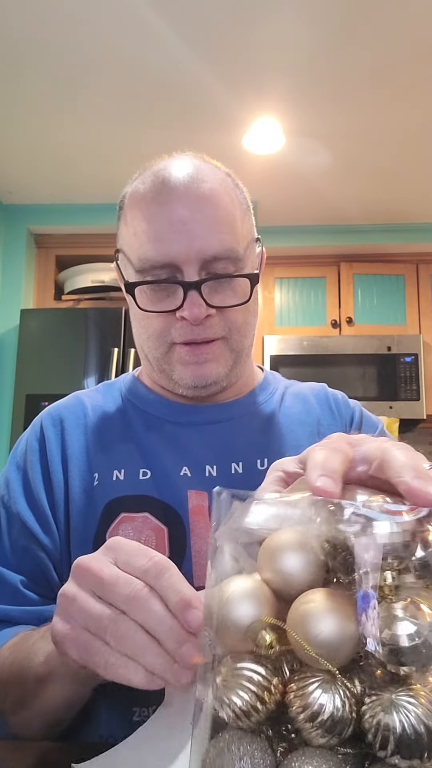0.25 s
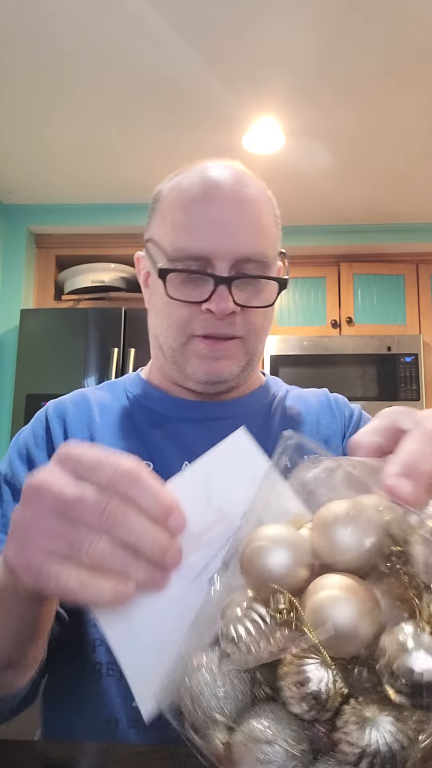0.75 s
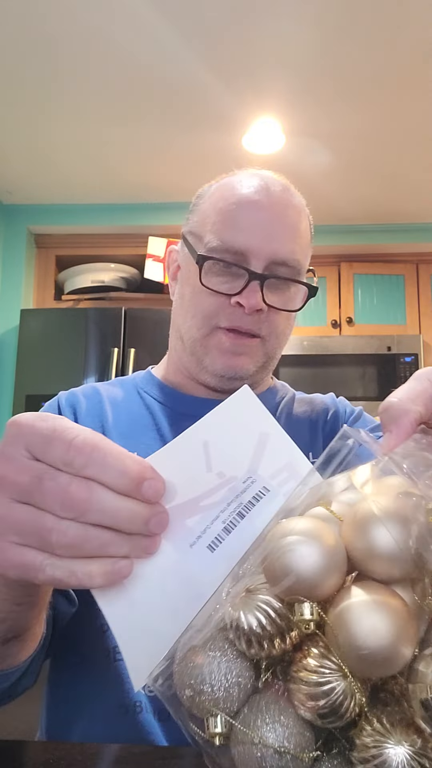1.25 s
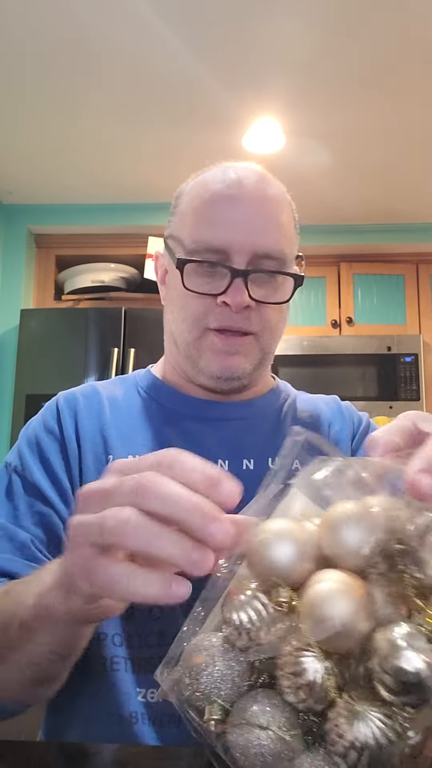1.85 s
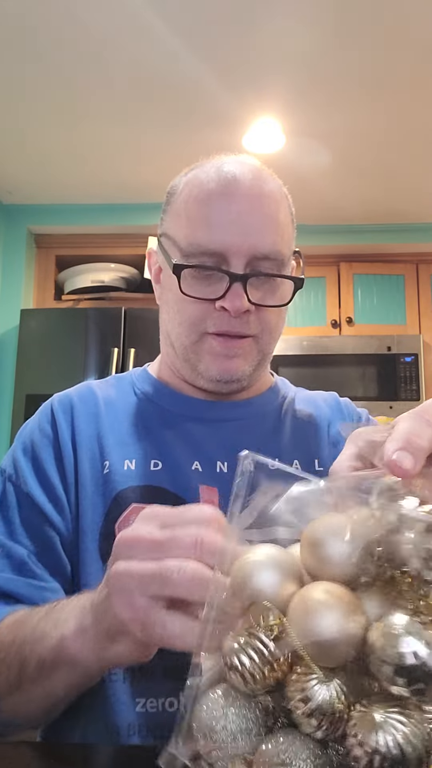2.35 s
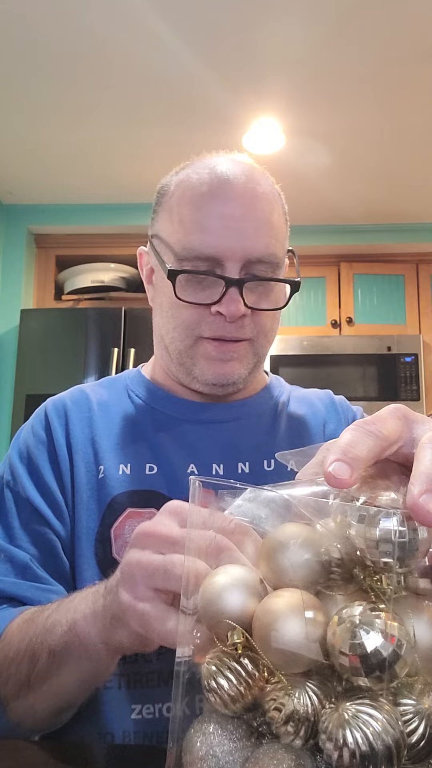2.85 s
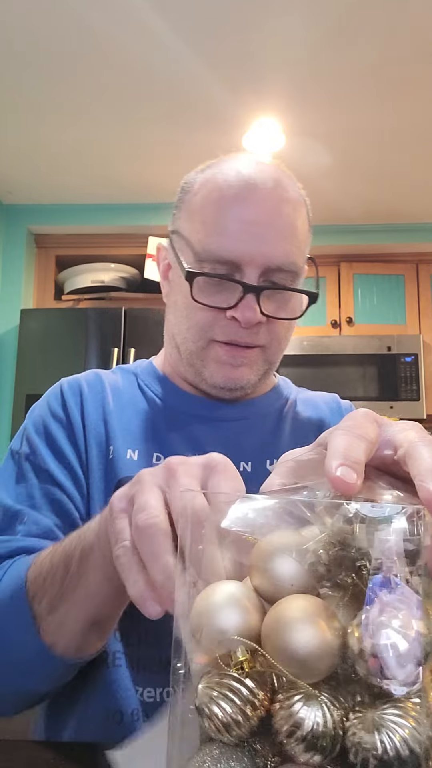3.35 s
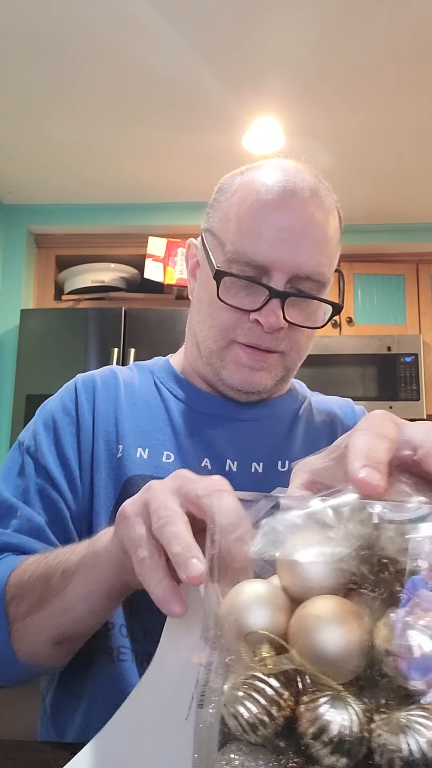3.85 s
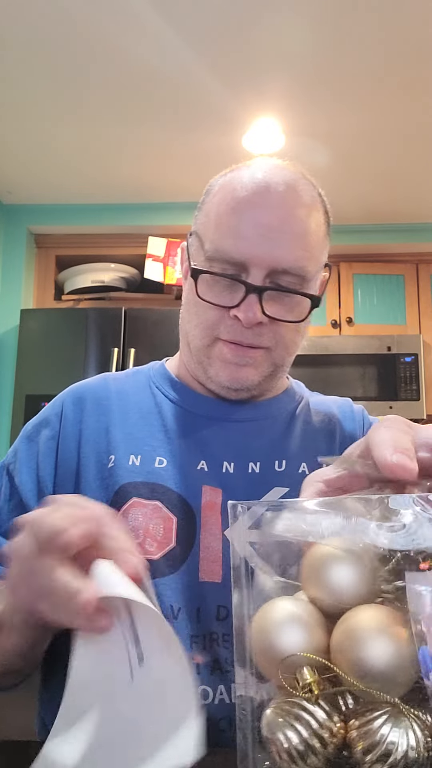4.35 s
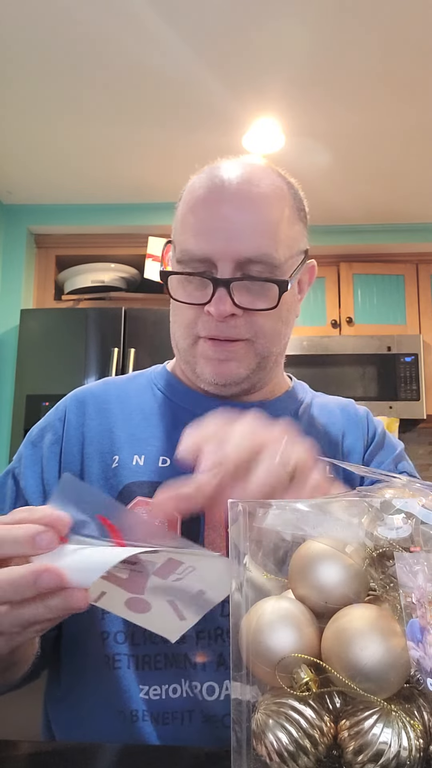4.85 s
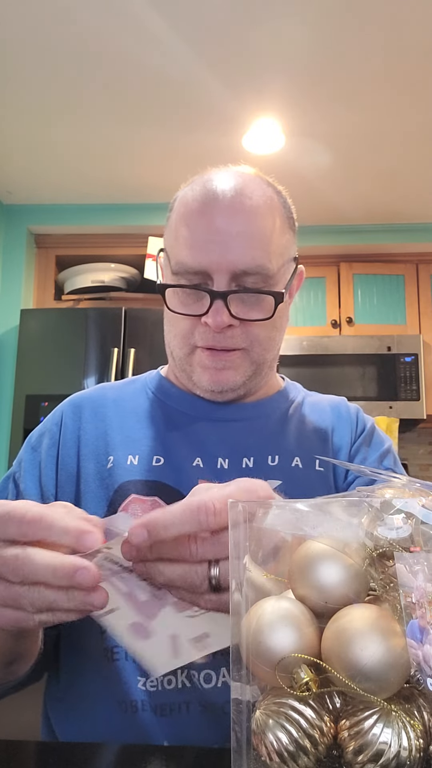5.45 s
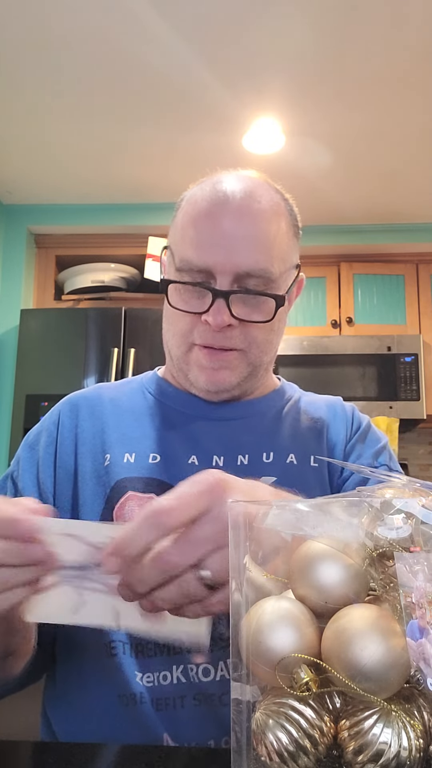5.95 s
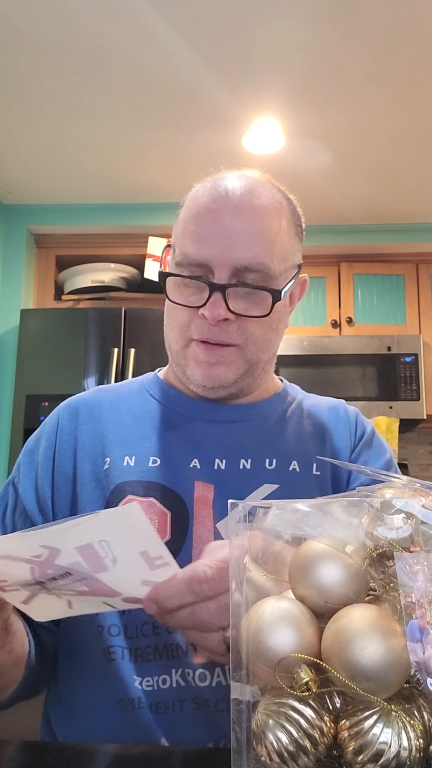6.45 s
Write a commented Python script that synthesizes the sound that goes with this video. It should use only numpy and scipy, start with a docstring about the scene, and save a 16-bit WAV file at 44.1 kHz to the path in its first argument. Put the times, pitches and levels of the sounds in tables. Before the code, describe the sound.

Close, dry handling in a small kitchen, slightly left of centre. At 0 s a hard plastic snap and crinkle burst out, fading at once into faint rubbing, tiny ticks and soft hollow bumps until about 1.7 s, with small clicks near 1.0-1.1 s. Light knocks and rustle follow, then a tight cluster of sharp cracks at 2.3-2.5 s, with a dull bump at 2.6 s. It quiets to sparse ticks and gentle rubbing, with a small snap near 3.5 s. From 3.8 to 4.2 s come the loudest rapid buckling snaps, with hollow booms and a rush of crinkling around 4.1 s. A few weaker clicks and bumps fade by 4.8 s. After a near-silent pause, card slides on card from 5.1 s in soft grainy hisses, flicking lightly at 5.5 and 5.65 s, with a brisker swish at 6.0 s and a faint bump and rumble around 6.3 s. Faint air and appliance hum stay beneath.

```python
"""Kitchen: hands turn a clear plastic pack of ornaments close to the microphone and pull a card out of it.
The stiff sheet buckles in sharp snaps (cracks, noise bursts, ringing modes); hollow balls knock about inside
(booms and short band-limited noise); the plastic rustles under the fingers (grainy filtered noise).
Then the card slides with a grainy hiss and is flicked open in small snaps.
Below lie counter rumble, still air (filtered noise) and a faint appliance hum (wavering sines)."""
import sys
import numpy as np
from scipy import signal
from scipy.fft import rfft, irfft
from scipy.io import wavfile
from scipy.ndimage import uniform_filter1d, minimum_filter1d

SR = 44100
rng = np.random.default_rng(int(sys.argv[2]) if len(sys.argv) > 2 else 0)


def output_pcm(signal):
    """Save a mono or channel-first signal as 16-bit PCM at the path in sys.argv[1].

    Samples are clipped to [-1, 1] before scaling.
    """
    pcm = np.clip(np.atleast_2d(signal).T, -1, 1) * 32767
    wavfile.write(sys.argv[1], SR, np.round(pcm).astype(np.int16))


N = 295029
TIME = np.arange(N) / SR  # s
AGE = np.arange(SR // 5) / SR  # s since a blow

# Effort of the hands on the pack and crumpling of the thin film.
# Each row: time in seconds, rubbing level in dB, crinkle level in dB, both before layer offsets.
EFFORT = [(0, -42, -27.5), (.04, -47.5, -52.5), (.13, -53.5, -54.5), (.24, -72, -97), (.41, -53, -49.5),
          (.53, -58.5, -65.5), (.79, -56.5, -60), (.98, -67, -71), (1.15, -62.5, -67), (1.46, -74, -95),
          (1.68, -60, -57), (1.88, -64, -73), (2.12, -50, -59), (2.42, -54.5, -57), (2.66, -53.5, -57),
          (2.89, -71.5, -75), (3.03, -65, -71), (3.15, -63.5, -68), (3.4, -57, -63.5), (3.6, -63.5, -60.5),
          (3.98, -52.5, -53), (4.1, -34.5, -33.5), (4.3, -46, -54), (4.39, -60, -63), (4.5, -49, -57),
          (4.63, -58.5, -78), (4.77, -80.5, -72.5), (5.1, -86.5, -93)]
# Speed of card sliding over card, as the level of its hiss.
# Each row: time in seconds, level in dB before layer offsets.
SLIDE = [(5.1, -73.5), (5.19, -61.5), (5.38, -63.5), (5.48, -56.5), (5.62, -56.5), (5.75, -67), (5.89, -68),
         (5.97, -47.5), (6.09, -53.5), (6.2, -78), (6.45, -64.5), (6.69, -84)]


def from_db(db):
    """Decibels to amplitude gain."""
    return 10 ** (np.asarray(db) / 20)


def rms_one(x):
    """Scale to rms 1."""
    return x / np.sqrt(np.mean(x ** 2) + 1e-20)


def unit_blow(x):
    """Scale a blow to the energy of 20 ms at rms 1."""
    energy = np.mean(np.sum(x ** 2, axis=-1))
    return x / np.sqrt(energy / (.02 * SR) + 1e-20)


def in_time(rows):
    """Interpolate a curve's columns at every sample."""
    s, *columns = np.transpose(rows)
    return [np.interp(TIME, s, column) for column in columns]


def at_hz(points, hz):
    """Interpolate a table on a log-frequency axis."""
    table_hz, values = np.array(points)[:, 0], np.array(points)[:, 1]
    return np.interp(np.log(np.maximum(hz, 1)), np.log(table_hz), values)


def band(x, low_hz, high_hz):
    """Gentle Butterworth band-pass."""
    edges_hz = [low_hz, min(high_hz, .45 * SR)]
    return signal.sosfilt(signal.butter(2, edges_hz, "band", fs=SR, output="sos"), x)


def colour(x, spectrum):
    """Causal minimum-phase filter with the given spectrum, by folding the cepstrum."""
    size = 4096
    bins_hz = np.arange(size // 2 + 1) * SR / size
    cepstrum = irfft(np.log(from_db(at_hz(spectrum, bins_hz))))
    cepstrum[1:size // 2] *= 2
    cepstrum[size // 2 + 1:] = 0
    impulse = irfft(np.exp(rfft(cepstrum)))
    return signal.fftconvolve(x, impulse[None], axes=-1)[:, :x.shape[-1]]


def pair(own, size=N):
    """Left and right white noise; own is the share of power unrelated between sides."""
    own = np.clip(own, 0, 1)
    white = rng.standard_normal((3, size))
    return np.sqrt(1 - own) * white[0] + np.sqrt(own) * white[1:]


def drift(knots_per_s):
    """Random curve: straight lines between normal knots of spread 1."""
    knots = rng.standard_normal(int(knots_per_s * N / SR) + 2)
    return np.interp(TIME * knots_per_s, np.arange(len(knots)), knots)


def panned(left_db):
    """Left and right gains; left_db is left relative to right."""
    return from_db(np.array([[left_db], [-left_db]]) / 2)


def dying(t60_s):
    """Exponential decay after a blow."""
    return from_db(-60 * AGE / max(t60_s, .002))


def add(out, s, sound):
    """Mix a blow in at its time."""
    start = max(int(s * SR), 0)
    out[:, start:start + len(AGE)] += sound[..., :N - start]


def follow(db, share):
    """A level that swings about easy handling by a share of its control's swing."""
    usual_db = -55
    return usual_db + share * (db - usual_db)


def background(hush_db):
    """Still air as coloured noise, plus an appliance hum of sines wavering in level and phase."""
    # Each row: frequency in Hz, typical rms level in dB.
    hum_tones = [(268, -69), (307, -82), (533, -79)]
    # Each row: frequency in Hz, relative level in dB.
    hush_spectrum = [(18, -45.5), (30, -14), (204, -7), (287, -4), (1160, -17.5), (1280, -14),
                     (1670, -26.5), (2120, -24), (2540, -37.5), (16000, -26.5)]
    hum = 0
    for hz, db in hum_tones:
        level = from_db(db + 2 * drift(3.2))
        phase = 2 * np.pi * hz * TIME + .5 * drift(4)
        hum = hum + level * np.sqrt(2) * np.sin(phase)
    return hum + from_db(hush_db) * rms_one(colour(pair(0.25), hush_spectrum))


def room_response(tail_db, echo_db):
    """Near echoes and a diffuse tail, its decay set by frequency; the bass is alike on both sides."""
    # Each row: frequency in Hz, T60 in seconds.
    room_t60 = [(100, 0.44), (300, 0.17), (1000, 0.19), (3500, 0.26), (8000, 0.27), (16000, 0.12)]
    # Counter, ceiling, cupboards. Each row: least delay in seconds, relative level in dB.
    echoes = [(.0021, -4.5), (.0078, -7.5), (.0093, -20), (0.0207, -20.5)]
    t = np.arange(SR // 2) / SR
    tail, edges_hz = 0, np.geomspace(60, 19000, 10)
    for low_hz, high_hz in zip(edges_hz, edges_hz[1:]):
        hz = np.sqrt(low_hz * high_hz)
        fade = from_db(-60 * t / at_hz(room_t60, hz))
        own = hz ** 2 / (hz ** 2 + 550 ** 2)
        tail = tail + band(pair(own, len(t)), low_hz, high_hz) * fade
    onset = np.clip((t - .002) / 0.009, 0, 1)
    response = from_db(tail_db) * rms_one(tail * onset) / np.sqrt(len(t))
    for delay_s, db in echoes:
        for side in response:
            echo = np.arange(len(t)) == int((delay_s + rng.uniform(0, .0008)) * SR)
            side += from_db(db + echo_db) * band(echo * 1., 950, 17000)
    return response


def kitchen(x, tail_db, echo_db, count=4):
    """The pack keeps moving, so its sound crossfades round a cycle of reflection patterns."""
    place = TIME / .07  # one pattern per 70 ms
    out = x.copy()
    for k in range(count):
        away = np.abs((place - k) % count - count / 2)
        share = np.cos(np.pi / 2 * np.minimum(away, 1))
        out += signal.fftconvolve(x * share, room_response(tail_db, echo_db), axes=-1)[:, :N]
    return out


def counter(shaking, level_db):
    """Deep worktop rumble: noise whose power follows drags and the low sound of what is handled on it."""
    # The pack or a forearm drags on the counter. Each row: start in seconds, length in seconds, level in dB.
    drags = [(.1, .75, -61), (1.15, 0.42, -62.5), (2.98, .75, -61), (6.246, .3, -52)]
    settle_s, drag_fade_s = 0.012, 0.27
    keep = np.exp(-1 / (settle_s * SR))
    low_power = band(shaking.mean(axis=0), 69, 190) ** 2
    power = from_db(level_db) ** 2 * signal.lfilter([1 - keep], [1, -keep], low_power)
    for s, length_s, db in drags:
        edge_s = np.minimum(TIME - s, s + length_s - TIME)
        swell = np.clip(edge_s / drag_fade_s, 0, 1)
        power = power + (from_db(db) * swell) ** 2
    return np.sqrt(power + 1e-20) * rms_one(band(pair(.02), 48, 74)) * panned(-3.5)


def friction(spectrum, own, per_s, grain_share, patchy_db):
    """Smooth rubbing with scattered tiny ticks of very uneven size; rms 1."""
    born = rng.random(N) < per_s * from_db(4 * drift(25)) / SR
    sizes = from_db(3.5 * np.minimum(rng.exponential(1, N), 3))
    ticks = pair(own) * born * sizes
    share = np.clip(grain_share, 0, 1)  # of power
    mixed = np.sqrt(share) * rms_one(ticks) + np.sqrt(1 - share) * pair(own)
    return rms_one(colour(mixed, spectrum) * from_db(patchy_db * drift(45)))


def card():
    """Card slides on card with a fine, grainy hiss and flexes softly as it goes."""
    # Each row: frequency in Hz, relative level in dB.
    card_spectrum = [(290, -28), (500, 7.5), (570, -7), (668, -12), (946, -3.5), (1060, -7), (1440, -2),
                     (2770, -13.5), (5020, -5.5), (6330, -11.5), (16000, -6)]
    flex_spectrum = [(60, -14), (180, -13), (240, -6), (275, -1.5), (340, -14), (440, -3), (540, -11.5),
                     (700, -10.5), (1200, -34)]
    speed_db, = in_time(SLIDE)
    slide = friction(card_spectrum, own=.8, per_s=700, grain_share=.55, patchy_db=1.8)
    flex = friction(flex_spectrum, own=0.07, per_s=110, grain_share=0.15, patchy_db=2.5)
    out = from_db(speed_db + 3.5) * slide
    out = out + from_db(follow(speed_db, share=.35) - 4.5) * flex
    return out * panned(-4.5) * (TIME >= SLIDE[0][0])


def handling():
    """The pack rumbles, rubs and crinkles with the effort of the hands until it is let go."""
    # Each row: frequency in Hz, relative level in dB.
    rumble_spectrum = [(40, -28.5), (100, -10.5), (180, -9), (270, -6.5), (400, -3), (600, -8), (1200, -35)]
    rub_spectrum = [(300, -21.5), (600, 0.5), (1200, 7.5), (2400, -1.5), (5000, -27)]
    crinkle_spectrum = [(1200, -11.5), (3000, 1.5), (5000, 0.5), (7500, -8), (9000, -8.5), (12500, -0.5),
                        (16000, -9.5)]
    effort_db, crinkle_db = in_time(EFFORT)
    rumble = friction(rumble_spectrum, own=.03, per_s=110, grain_share=0.12, patchy_db=6.0)
    rub = friction(rub_spectrum, own=.3, per_s=200, grain_share=.7, patchy_db=2)
    crinkle = friction(crinkle_spectrum, own=.7, per_s=350, grain_share=.7, patchy_db=2)
    out = from_db(follow(effort_db, share=0.82) + 4.1) * rumble
    out = out + from_db(effort_db - 3.0) * rub
    out = out + from_db(crinkle_db - 3) * crinkle
    return out * panned(-5.5) * (TIME < EFFORT[-1][0])


def burst(t60_s, own, grain_db):
    """Crowded modes of a thin sheet as dying noise, fed unevenly by tiny slips along the crease."""
    knots_s = AGE[::40]
    slips = np.interp(AGE, knots_s, rng.standard_normal(len(knots_s)))
    return pair(own, len(AGE)) * dying(t60_s) * from_db(grain_db * slips)


def crackle(level_db, per_s, t60_s):
    """Small creases let go at random, each a tiny dry tick of its own size and pitch."""
    out = np.zeros((2, N))
    for when, size, pitch in rng.random((int(per_s * N / SR), 3)):
        hz = 1500 * 7 ** pitch
        tick = unit_blow(band(burst(t60_s, own=.5, grain_db=3), hz / 1.8, hz * 2.2))
        add(out, when * N / SR, from_db(level_db[int(when * N)] - 10 * size) * tick)
    return out


def small_ticks(pack_db, card_db):
    """Ticks grow with the crumpling of the film; the soft card can only tick faintly."""
    crinkle_db, speed_db = in_time(EFFORT)[-1], in_time(SLIDE)[-1]
    card_level_db = np.minimum(speed_db, -54) + card_db
    level_db = np.where(TIME < SLIDE[0][0], crinkle_db + pack_db, card_level_db)
    return crackle(level_db, per_s=55, t60_s=.01) * panned(-3)


def ring(modes, detune, scatter_db, spread_db, polarity):
    """Each blow lands elsewhere, so strengths and pitches vary. Modes in step start hard; opposed ones bloom."""
    out = 0
    for k, (hz, db, t60_s) in enumerate(modes):
        mode_hz = hz * (1 + detune * rng.normal())
        strength = from_db(db + scatter_db * rng.normal() + spread_db * rng.normal(size=(2, 1)))
        out = out + polarity ** k * strength * np.sin(2 * np.pi * mode_hz * AGE) * dying(t60_s)
    return unit_blow(out)


def boom():
    """Modes of the air and walls of the pack, shared by snaps, flicks and knocks."""
    # Each row: nominal frequency in Hz, relative level in dB, T60 in seconds.
    pack_modes = [(110, -14, .07), (165, -16, .06), (210, -10, .05), (239, -2, .11), (279, 0, .12),
                  (351, -1, .11), (415, -6, .05), (480, -9, .04), (545, -11, .04)]
    return ring(pack_modes, detune=.012, scatter_db=2.5, spread_db=1, polarity=-1)


def knocks(boom_db, thud_db, clack_db):
    """Soft bumps wake the air in the pack, with a dull thud and a short clack of hollow balls."""
    # Balls and fingers bump the pack.
    # Each row: start in seconds, boom level in dB, thud level in dB, both before layer offsets.
    bumps = [(.25, -47, -73), (.409, -32.5, -47), (.514, -44, -46.5), (.669, -32.5, -42), (0.764, -36, -76),
             (1.64, -34, -49), (1.771, -25, -41.5), (1.99, -30, -47), (2.107, -29, -45),
             (2.235, -36, -44.5), (2.421, -29, -41.5), (2.593, -21.5, -46), (2.689, -27, -69),
             (2.794, -38, -68), (3.028, -40.5, -69), (3.363, -50, -49), (3.662, -31.5, -49.5),
             (3.821, -14, -36), (4.235, -22.5, -30.5), (4.43, -29, -48), (4.6, -29.5, -44.5),
             (4.978, -58, -73), (6.281, -31.5, -56), (6.42, -42, -41.5), (6.577, -42.5, -52)]
    clack_follows = 1.08  # dB per dB of boom
    out = np.zeros((2, N))
    for s, low_db, bump_thud_db in bumps:
        body = from_db(low_db + boom_db) * boom()
        thud = unit_blow(band(burst(0.02, own=0.016, grain_db=7.5), 62, 210))
        clack = unit_blow(band(burst(.06, own=.2, grain_db=3), 520, 1500))
        push = from_db(bump_thud_db + thud_db) * thud
        balls = from_db(clack_follows * low_db + clack_db) * clack
        add(out, s, body + push + balls)
    return out * panned(-4)


def crack(width_s):
    """One push and pull of air as a dent flips over; height 1."""
    phase = AGE / width_s - 3
    return -phase * np.exp((1 - phase ** 2) / 2)


def snapping(rows, crack_db, boom_db, panel_db, crease_db, sizzle_db):
    """A snap: crack, crease burst, ringing panels, air boom; bright ones trade ring for sizzle."""
    # Flat panels of the pack. Each row: nominal frequency in Hz, relative level in dB, T60 in seconds.
    panel_modes = [(694, -5, 0.05), (800, -12.5, 0.018), (996, 2.5, 0.025), (1231, -1.5, 0.033),
                   (1360, -7, 0.0033), (1580, -4.5, 0.0057)]
    # Each row: frequency in Hz, filter gain in dB.
    crease_spectrum = [(1500, -7), (2000, -2.5), (2500, -2), (3200, -2.5), (4200, -4.5), (5200, -8),
                       (6500, -19)]
    sizzle_spectrum = [(5000, 2.5), (6500, -2), (7600, -1.5), (8600, -8.5), (10500, -3), (12000, 0.5),
                       (14000, -2.5), (16000, -8)]
    crack_follows = 0.69  # dB per dB of strength
    t60_at_0_db_s, t60_follows = 0.044, 0.1  # weaker dents die sooner: dB of length per dB
    pan_db, pan_spread_db = -3.5, 0.8
    out, creases, sizzles = np.zeros((3, 2, N))
    for s, db, bright_db, low_db in rows:
        side = panned(pan_db + pan_spread_db * rng.normal())
        t60_s = t60_at_0_db_s * from_db(t60_follows * db)
        crowd = unit_blow(band(burst(0.56 * t60_s, own=0.074, grain_db=2.5), 680, 1700))
        modes = ring(panel_modes, detune=.06, scatter_db=3.5, spread_db=2.5, polarity=1)
        panels = unit_blow(modes + crowd)
        height = min(from_db(crack_follows * db + crack_db), .5)  # a dent can only flip so far
        ringing = from_db(db - bright_db + panel_db) * panels
        add(out, s, side * (height * crack(width_s=.000035) + ringing))
        add(out, s, side * from_db(low_db + boom_db) * boom())
        fold = unit_blow(band(burst(t60_s, own=.55, grain_db=3), 1700, 6300))
        fizz = unit_blow(band(burst(.9 * t60_s, own=.7, grain_db=4.5), 5700, 18000))
        add(creases, s, side * from_db(db + crease_db) * fold)
        add(sizzles, s, side * from_db(db + bright_db + sizzle_db) * fizz)
    return out + colour(creases, crease_spectrum) + colour(sizzles, sizzle_spectrum)


def scene():
    """Pack and card sound close by in the kitchen, over the counter's rumble and the still air."""
    # Sheet buckles, with an early echo at .051 s, then card flicks.
    # Each row: start in seconds, strength in dB, brightness in dB, boom in dB, all before layer offsets.
    snap_rows = [(.011, -33.5, 0, -32), (.043, -21, -2.5, -31.5), (.051, -34, 13, -23),
                 (.318, -51.5, -9, -57), (.361, -57, -3, -49), (.376, -52.5, 2, -45),
                 (.414, -44.5, 1, -38.5), (.4475, -49.5, 11, -59), (.586, -56.5, 1.5, -50),
                 (.6545, -53.5, -1, -51), (.692, -52, -4, -55), (.781, -56, -0.5, -49),
                 (.882, -52, -8, -41), (.935, -58.5, 1, -57), (1.003, -43.5, 4, -44.5),
                 (1.122, -41, 0, -42.5), (1.36, -59.5, -1.5, -50.5), (1.439, -64, 1, -72),
                 (1.691, -51, -1, -43.5), (1.7625, -37.5, -2, -57), (1.798, -35, -1, -40),
                 (1.9875, -50, -8, -47.5), (2.195, -57, -15.5, -44.5), (2.211, -53, -5.5, -44.5),
                 (2.3045, -28, -2, -38), (2.3285, -26.5, -3.5, -45), (2.336, -26.5, 6.5, -40.5),
                 (2.356, -20, -5.5, -24.5), (2.377, -42.5, 14, -34), (2.405, -34.5, 8.5, -41),
                 (2.42, -31.5, 0.5, -30), (2.462, -37, -2, -37), (2.534, -61, 8, -47),
                 (2.73, -52, -3.5, -60), (2.768, -50, -4, -47.5), (2.8465, -64.5, -10, -52),
                 (2.962, -48, 4, -47), (2.989, -40, -6, -35), (3.2307, -49, -1.5, -47.5),
                 (3.347, -53, -5, -44), (3.4656, -50, -1.5, -43), (3.513, -36.5, -1, -35),
                 (3.652, -55.5, 6, -53), (3.712, -46, -4, -37.5), (3.769, -43.5, -2, -48.5),
                 (3.7904, -19.5, -3, -29), (3.8355, -18.5, -2, -24.5), (3.8717, -21, -2, -27.5),
                 (3.993, -20, -1, -19.5), (4.0428, -25, -1, -28), (4.071, -20, -0.5, -24.5),
                 (4.1296, -28, -8.5, -42), (4.143, -16.5, 0, -18.5), (4.178, -18, -3, -33),
                 (4.192, -26.5, -9, -18.5), (4.208, -18, 0, -10.5), (4.221, -34.5, -14.5, -14.5),
                 (4.4823, -38.5, 2.5, -38.5), (4.587, -46.5, -10.5, -34.5), (4.612, -53, 1.5, -48)]
    flick_rows = [(5.178, -69, -7, -48), (5.311, -58.5, 6, -74), (5.476, -53.5, 10.5, -68),
                  (5.505, -34.5, 5.5, -47), (5.648, -39, 5, -33.5), (5.657, -55, -5, -52),
                  (5.874, -57, -2, -50), (6.283, -49.5, -0.5, -41), (6.3566, -59, 16.5, -51),
                  (6.423, -57, -13.5, -39.5), (6.454, -66, 12, -73)]
    snaps = snapping(snap_rows, crack_db=-1.9, boom_db=-1.0, panel_db=-2.0, crease_db=2.2, sizzle_db=0.8)
    flicks = snapping(flick_rows, crack_db=-0.5, boom_db=-6.0, panel_db=-4.0, crease_db=-4.0, sizzle_db=-0.3)
    ticks = small_ticks(pack_db=1.5, card_db=2)
    bumps = knocks(boom_db=-7, thud_db=0.0, clack_db=-19.5)
    near = snaps + flicks + ticks + bumps + handling() + card()
    in_room = kitchen(near, tail_db=-6.0, echo_db=-0.5)
    return in_room + counter(near, level_db=-14) + background(hush_db=-70)


def record(dry):
    """A fast limiter holds down the loudest snaps; the deepest bass and the top are cut."""
    ceiling, low_cut_hz, high_cut_hz = 0.71, 38, 16000
    dry = signal.sosfilt(signal.butter(4, low_cut_hz, "high", fs=SR, output="sos"), dry)
    over_db = np.maximum(20 * np.log10(np.abs(dry).max(axis=0) / ceiling + 1e-9), 0)
    release_db = 900 * TIME  # 900 dB per s
    held_db = np.maximum.accumulate(over_db + release_db) - release_db
    cut_db = uniform_filter1d(minimum_filter1d(-held_db, size=21), size=21)
    top_cut = signal.ellip(10, .2, 70, high_cut_hz, fs=SR, output="sos")
    return signal.sosfilt(top_cut, dry * from_db(cut_db))


dry = scene()
out = record(dry)
output_pcm(out)
```